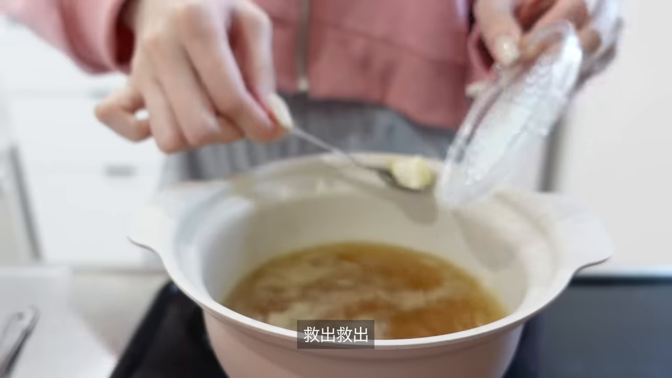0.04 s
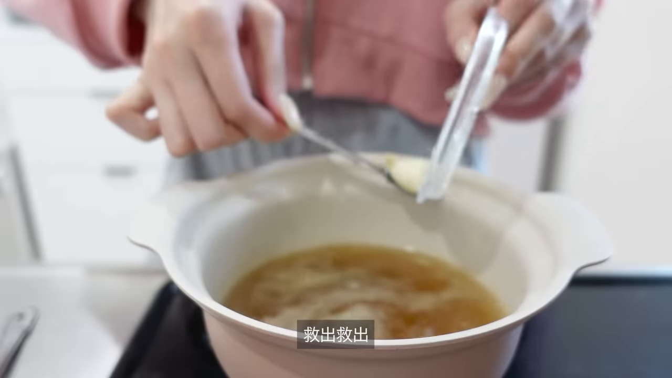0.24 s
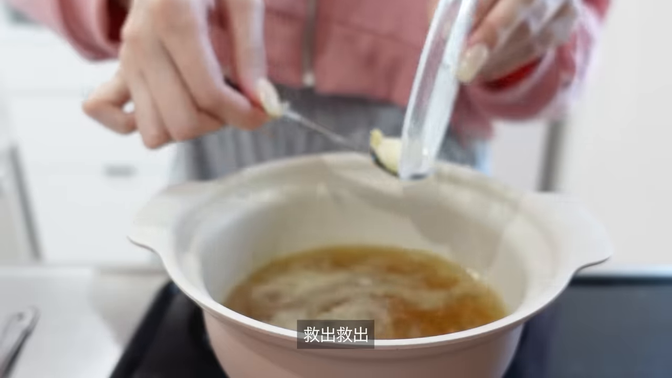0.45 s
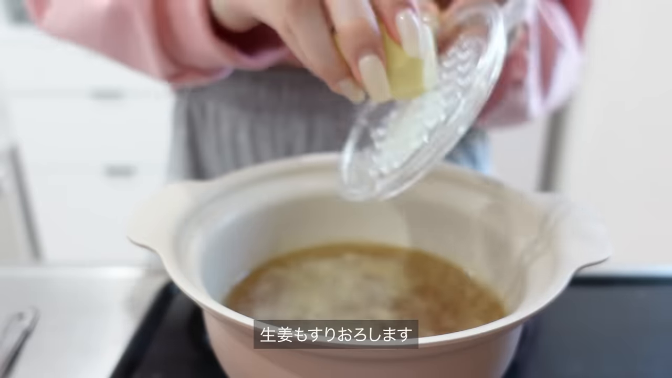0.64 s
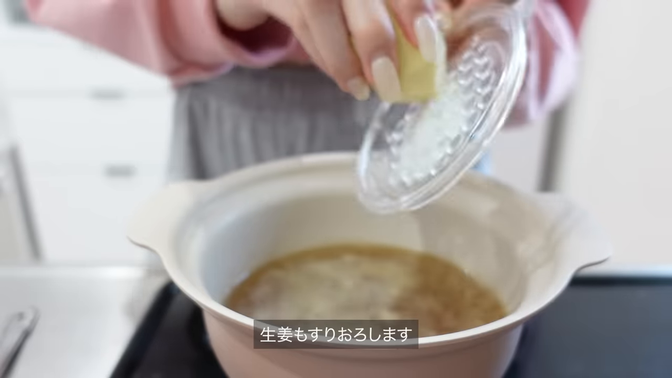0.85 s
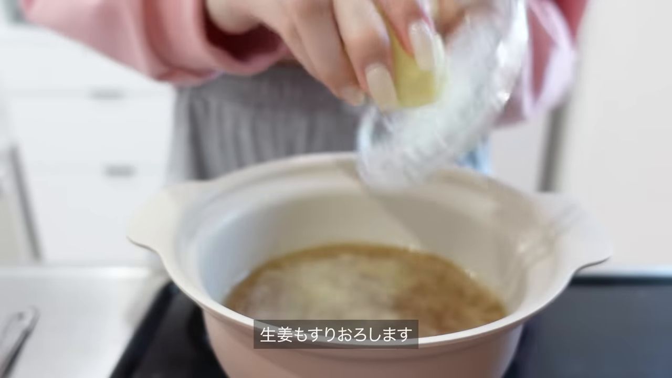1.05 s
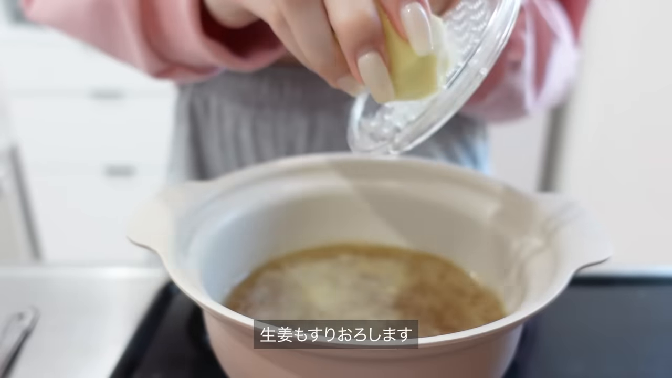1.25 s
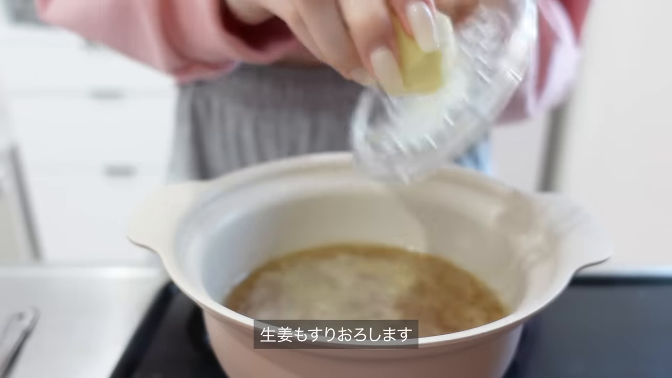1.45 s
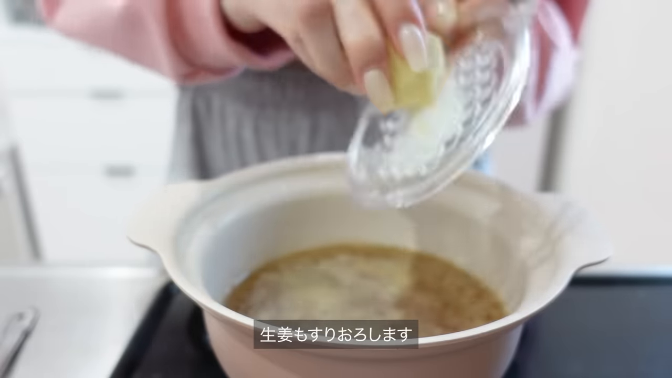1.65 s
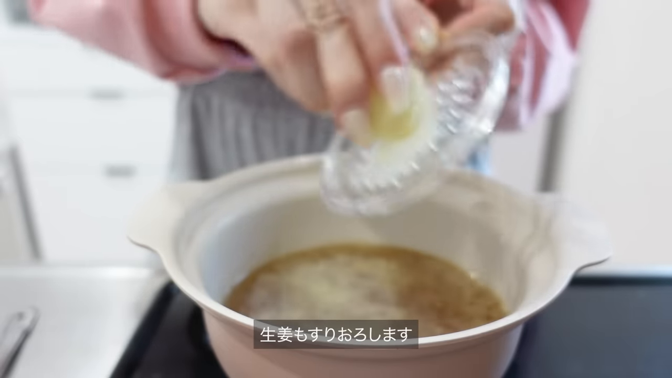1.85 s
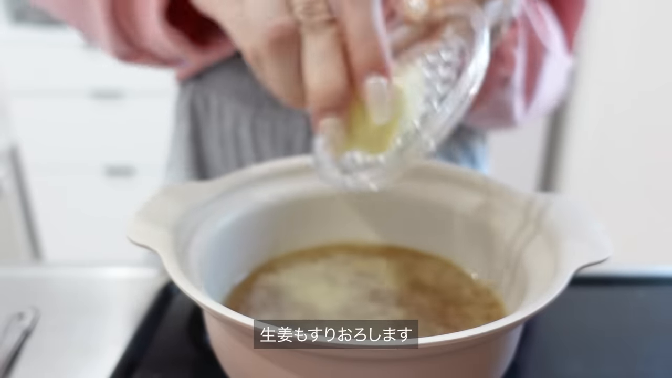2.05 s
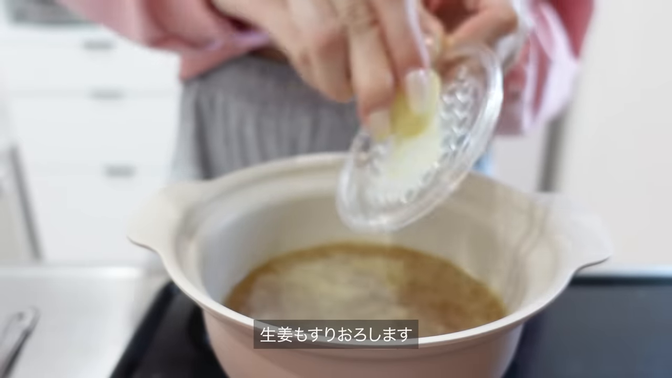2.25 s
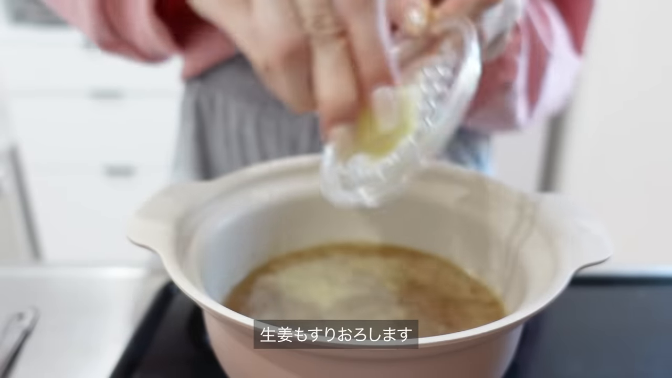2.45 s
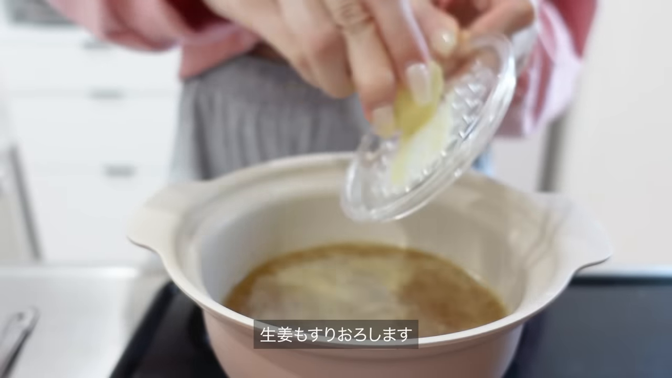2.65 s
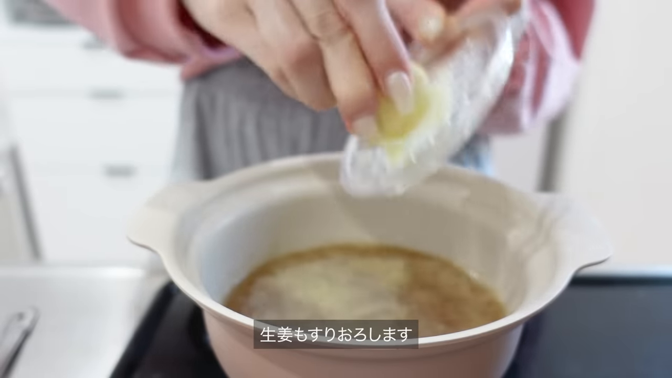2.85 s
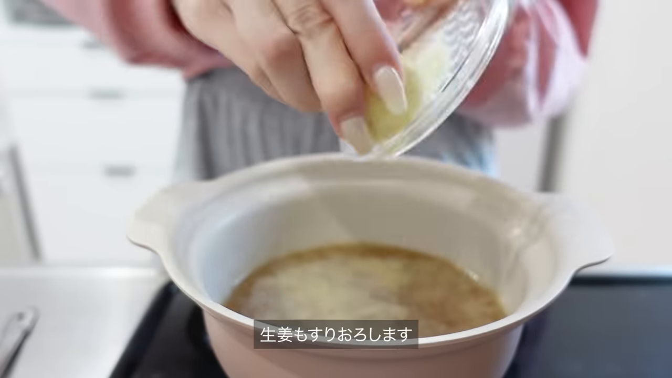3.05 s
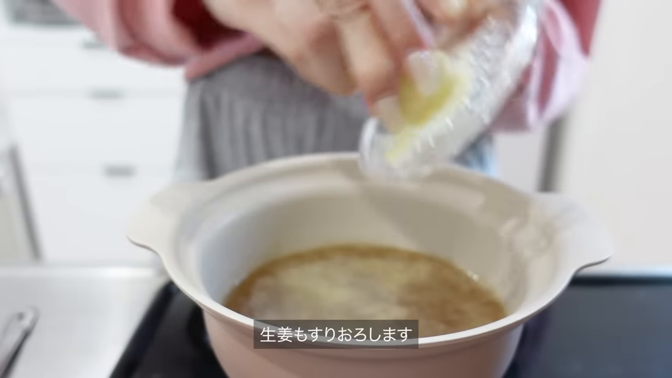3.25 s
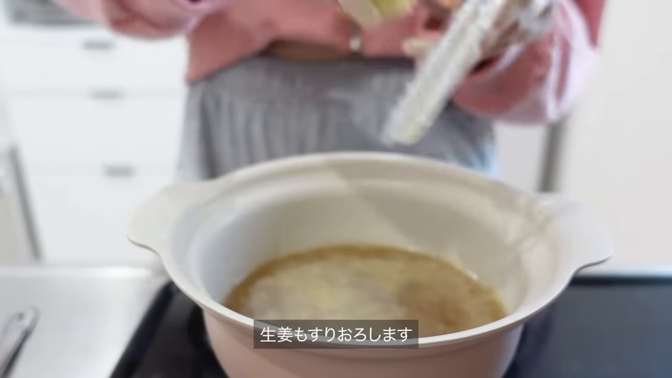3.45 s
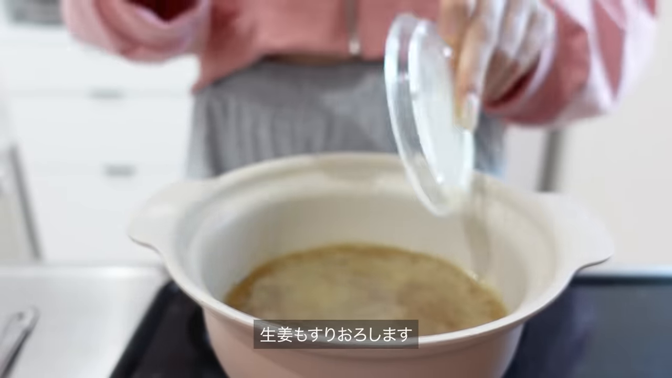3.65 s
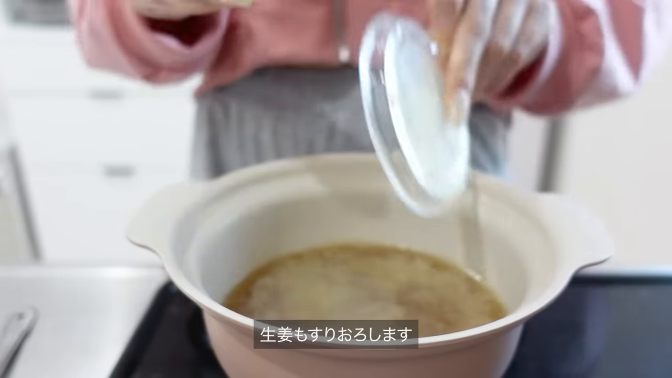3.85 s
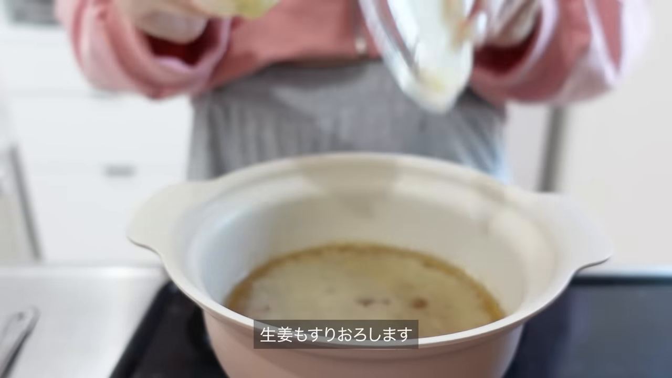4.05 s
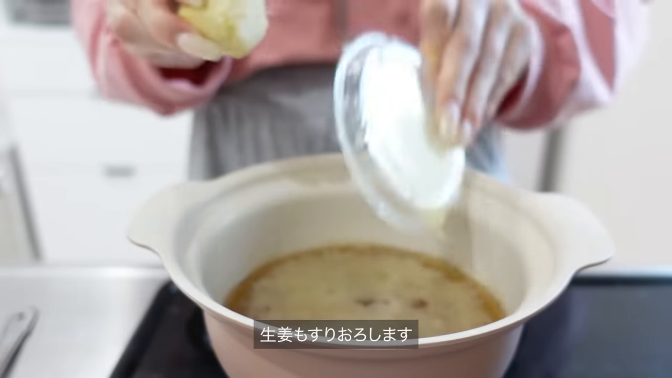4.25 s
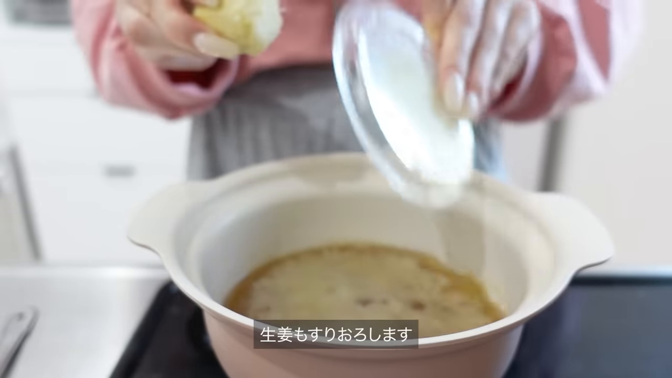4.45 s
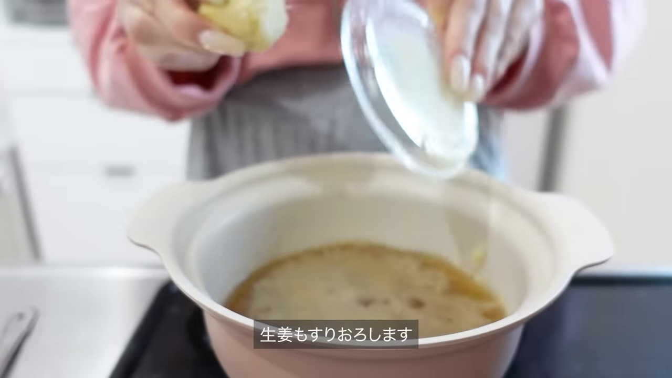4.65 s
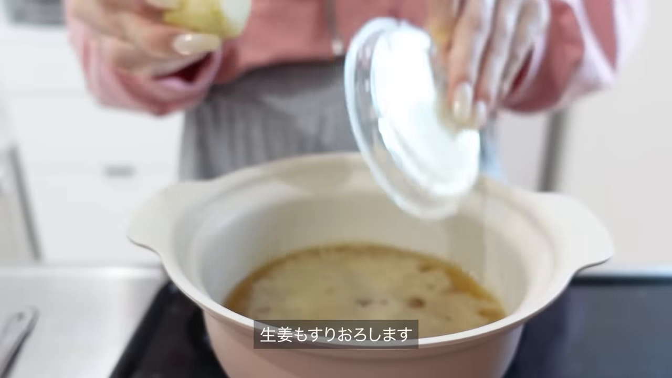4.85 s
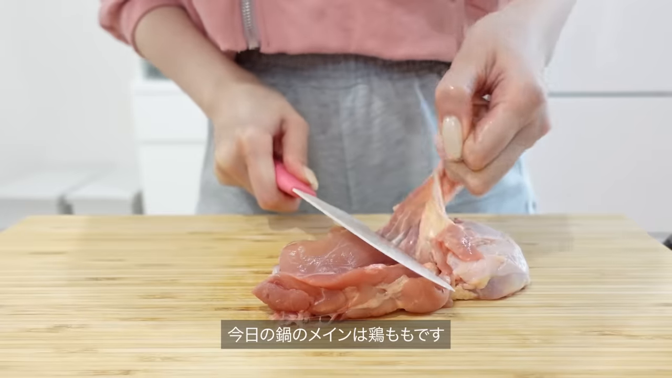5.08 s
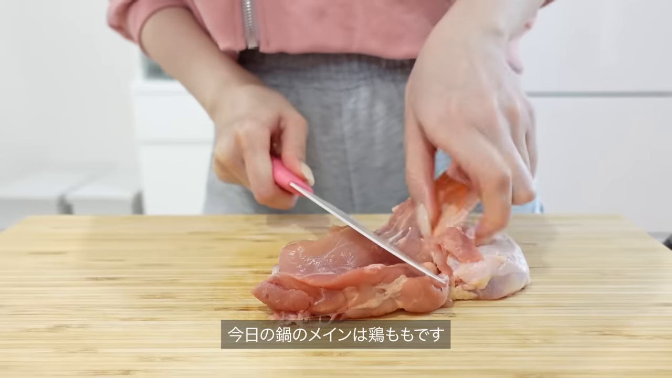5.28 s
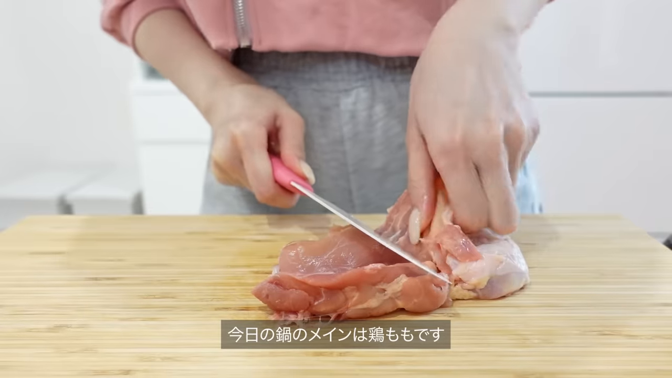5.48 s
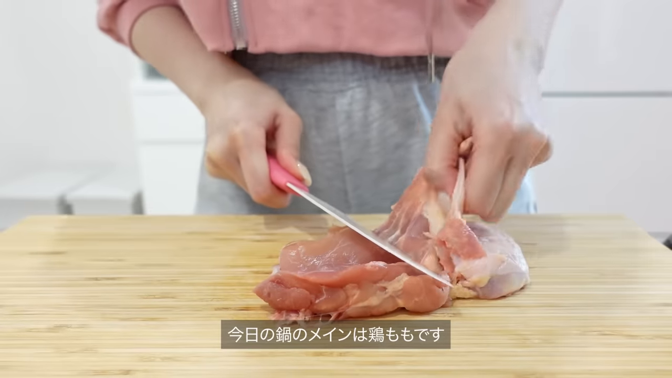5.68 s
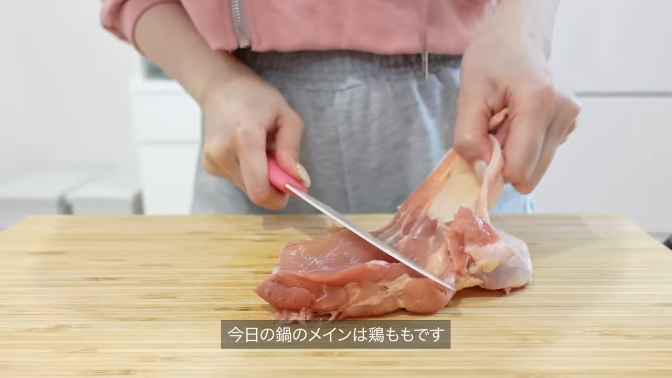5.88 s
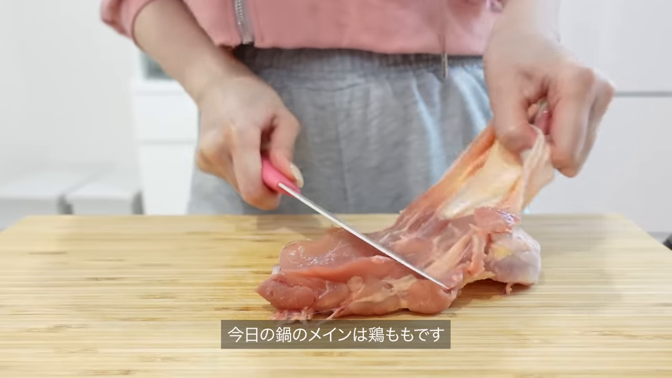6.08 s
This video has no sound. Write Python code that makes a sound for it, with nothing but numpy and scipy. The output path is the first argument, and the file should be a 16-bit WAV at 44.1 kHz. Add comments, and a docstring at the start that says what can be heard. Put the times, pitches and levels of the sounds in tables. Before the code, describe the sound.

A close stereo microphone in a small, lightly reverberant kitchen, with faint steady air. From 0 to 0.3 seconds a spoon scrapes glass with a thin metallic ring, ending in a tick. After a small tap at 0.7, ginger is grated on glass teeth: fibrous, bright rasps, about twelve strokes a second, the glass ringing most at first. At 1.94 everything abruptly becomes faster and higher, about twenty-four strokes a second, with brief snags, easing until 3.48. A soft wet swish follows, then five rapid glass-on-pot knocks from 3.65 to 3.9. At natural speed again from 4.07, a strong knock lands at 4.28, followed by four more until 4.78, cracking, glassy and booming, over faint hiss. From 4.94 it is quiet: a knife works through raw chicken with ticks around 5.05 to 5.3, soft wet rubs, sparse tiny snaps and a weak low hum until 6.2.

```python
"""Ginger is grated on a glass grater over a ceramic pot of broth: fibres snap on the teeth, stroke by stroke.
A spoon scrapes the glass first. Later the grater knocks the pot's rim in two bursts of decaying modes,
crack and boom that a limiter flattens; then a knife works softly through raw chicken (rubs and snaps).
In the fast middle stretch the strokes, knocks and air are quicker and higher."""
import sys
import numpy as np
from scipy import signal
from scipy.fft import rfft, irfft, next_fast_len
from scipy.io import wavfile
from scipy.ndimage import uniform_filter1d, minimum_filter1d

SR = 44100
rng = np.random.default_rng(int(sys.argv[2]) if len(sys.argv) > 2 else 0)


def int16_out(signal):
    """Quantize to a 16-bit WAV file."""
    q = np.round(np.clip(np.atleast_2d(signal).T, -1, 1) * 32767)
    wavfile.write(sys.argv[1], SR, q.astype(np.int16))


N = 269886
T = np.arange(N) / SR


def amp(db):
    """Decibels to gain."""
    return 10 ** (np.asarray(db) / 20)


def unit(x):
    """Scales to rms 1."""
    return x / np.sqrt(np.mean(x ** 2) + 1e-20)


def read(points, hz):
    """A table joined by straight lines on a log-frequency axis."""
    f, value = np.transpose(points)
    return np.interp(np.log(hz + 1), np.log(f + 1), value)


def level(points):
    """Gain over time from rows of (time [s], level [dB]); silent outside them."""
    return amp(np.interp(T, *np.transpose(points), left=-200, right=-200))


def swells(rows):
    """Gain over time from bell-shaped swells: rows of (middle [s], length [s], level [dB])."""
    power = np.zeros(N)
    for middle_s, length_s, db in rows:
        offset = 2 * (T - middle_s) / length_s
        power += amp(db) ** 2 * np.exp(-2 * np.minimum(offset ** 2, 100))
    return np.sqrt(power)


def between(start_s, stop_s):
    """True from start to stop."""
    return (T >= start_s) & (T < stop_s)


def colour(x, points, speed=1):
    """Filters by a spectrum, moved up by the speed."""
    size = next_fast_len(x.shape[-1])
    hz = np.fft.rfftfreq(size, 1 / SR)
    return irfft(rfft(x, size) * amp(read(points, hz / speed)), size)[..., :x.shape[-1]]


def low_cut(x, hz):
    """Takes away the deepest bass."""
    return signal.sosfilt(signal.butter(N=4, Wn=hz, btype="high", fs=SR, output="sos"), x)


def noise(size):
    """Two unrelated noises: middle and side."""
    return rng.standard_normal((2, size))


def grains(per_s, spread_db):
    """A dense train of tiny snaps of uneven size."""
    sizes = amp(spread_db * np.minimum(rng.exponential(1, N), 4))
    return unit(noise(N) * sizes * (rng.random(N) < per_s / SR))


def resonate(x, hz, width_hz):
    """A one-pole resonance, shifted up to a frequency that may follow a curve."""
    turn = np.exp(2j * np.pi * np.cumsum(hz * np.ones(x.shape[-1])) / SR)
    r = np.exp(-np.pi * width_hz / SR)
    return 2 * (turn * signal.lfilter([1 - r], [1, -r], x / turn + 1e-18)).real


def resonate_twice(x, hz, width_hz):
    """Two equal resonances in series, for steeper skirts."""
    return resonate(resonate(x, hz, width_hz), hz, width_hz)


def fade(t, t60):
    """Falls by 60 dB in t60."""
    return np.exp(-np.log(1000) * t / t60)


def add(mix, s, sound):
    """Mixes a sound in at time s."""
    part = mix[:, round(s * SR):][:, :sound.shape[1]]
    part += sound[:, :part.shape[1]]


# kitchen decay at natural speed: (frequency [Hz], t60 [s])
ROOM_DECAY = [(100, 0.75), (300, 0.4), (1000, 0.28), (4000, 0.29), (9000, 0.27), (16000, 0.43)]


def die_away(x, speed, rise_cycles=4):
    """Lets each band build up (bass slowest) and decay as the kitchen does."""
    hz, t, z = signal.stft(x, SR, nperseg=256)
    hz, t = hz[:, None] / speed, t * speed
    swell = 1 - np.exp(-t / (rise_cycles / (hz + 150) + 0.004))
    decayed = z * swell * fade(t, read(ROOM_DECAY, hz))
    return signal.istft(decayed, SR, nperseg=256)[1][:, :x.shape[1]]


def in_room(x, wet_db, speed=1):
    """A sound with its diffuse tail."""
    tail = die_away(noise(SR // 2), speed)
    tail /= np.linalg.norm(tail[0])
    return x + amp(wet_db) * signal.oaconvolve(x, tail, axes=1)[:, :N]


# reflections off pot, hands and counter, at natural speed: (delay [s], level [dB])
CLOSE_ECHOES = [(.0017, -35), (.0031, -19), (.0049, -28), (.0077, -21.5), (0.011, -16)]


def reflect(x, speed):
    """Adds the close reflections, which comb the spectrum."""
    out = x.copy()
    for delay_s, db in CLOSE_ECHOES:
        add(out, delay_s / speed, amp(db) * x)
    return out


# background air spectrum at natural speed: (frequency [Hz], density [dB per Hz])
AIR_SPECTRUM = [(25, -44), (50, -26), (80, -17.5), (130, -2), (180, -0.5), (260, -4), (350, 0.5), (500, -6),
                (680, -5.5), (1400, -13), (2200, -13), (3300, -16), (7000, -19), (16000, -28)]
AIR_DB = -63


def room_air(speed):
    """Steady coloured noise, moved up by the speed."""
    return amp(AIR_DB) * unit(colour(noise(N), AIR_SPECTRUM, speed))


# narrow scrape resonances: (frequency [Hz], width of each of two passes [Hz], level [dB])
SPOON_MODES = [(2140, 310, -1), (3660, 100, 2.5), (3890, 38, 4.5), (4730, 160, -0.5), (5460, 80, -1),
               (6070, 100, 0), (6950, 160, -.5), (7530, 110, 0.5), (8370, 90, -8), (9060, 140, -7.5),
               (9360, 180, -11), (10330, 110, -13)]
# dull rubbing under the scrape: (frequency [Hz], density [dB per Hz])
DULL_SPECTRUM = [(40, -32), (110, -8), (170, 3), (260, -9), (340, -3), (650, -5), (1300, -14.5),
                 (3000, -15), (16000, -53)]
# harder bites of the spoon: (middle [s], length [s], level [dB])
SPOON_BITES = [(.11, 0.034, -56), (.281, 0.049, -48)]
# light drag, then lift-off
DRAG_DB, LIFT_S, LIFT_DB_PER_S = -61, 0.29, 110


def spoon(dull_db=-3):
    """Metal slips on glass, ringing narrow resonances over a dull rubbing."""
    slips = grains(per_s=2800, spread_db=1.5)[:, :SR // 2]
    ring = sum(amp(db) * resonate_twice(slips, hz, width_hz) for hz, width_hz, db in SPOON_MODES)
    scrape = np.zeros((2, N))
    add(scrape, 0, unit(ring) + amp(dull_db) * unit(colour(slips, DULL_SPECTRUM)))
    drag = amp(DRAG_DB - LIFT_DB_PER_S * np.clip(T - LIFT_S, 0, 1))
    return in_room(scrape * np.hypot(drag, swells(SPOON_BITES)), wet_db=-4.5)


# touches of spoon, ginger and knife:
# (time [s], level [dB], low edge of snap [Hz], ring level [dB], t60 [s])
TOUCHES = [(0.33, -40, 2500, -12, 0.043), (0.7023, -36.5, 1420, -9, 0.1), (4.0444, -38.5, 6100, -8, 0.015),
           (5.0427, -35, 3630, 13, 0.016), (5.084, -45, 3770, 21, 0.033), (5.103, -46, 3500, 5, 0.045),
           (5.1517, -53.5, 4120, 19, 0.036), (5.269, -42.5, 6100, 3, .015), (5.285, -40.5, 5200, -19, .02),
           (5.607, -50.5, 7100, -10.5, 0.0086), (5.9335, -53, 9040, -2, 0.051),
           (6.068, -46.5, 7800, -15, .025), (6.083, -52.5, 4100, 17, 0.087)]


def ticks():
    """Short bright snaps, each with one low ring."""
    out, t = np.zeros((2, N)), np.arange(SR // 8) / SR
    for s, db, edge_hz, ring_db, t60 in TOUCHES:
        snap = colour(noise(len(t)), [(edge_hz * 0.81, -24), (edge_hz, 0), (16000, -10)])
        ring = resonate(snap, edge_hz * 0.954, 500)
        add(out, s, amp(db) * unit(snap + amp(ring_db) * ring) * fade(t, t60))
    return in_room(out, wet_db=-7)


# evenly paced runs of strokes: (middle of first stroke [s], stroke to stroke [s])
STROKE_RUNS = [(.783, .0826), (1.354, .0798), (1.967, .0417), (2.298, .0402), (2.707, .0443),
               (3.065, .0435)]
# pressure on the teeth: (time [s], level [dB])
PRESS_LEVEL = [(.783, -32.5), (.93, -30), (1.27, -29.5), (1.42, -32), (1.91, -31), (1.98, -34.3),
               (2.55, -36), (2.67, -33.5), (2.88, -40), (2.98, -34.5), (3.46, -37)]
GRATING_END_S = 3.48
STROKE_S = 0.05  # mean, at natural speed
PUSH_DB, PUSH_SHORTER = 0.5, 0.085  # added for a push, reversed for a pull; the second is a fraction


def stroke_plan(start_s, stop_s, speed):
    """Pulls and louder, shorter pushes in turn: rows of (middle [s], length [s], level [dB])."""
    ends = [s for s, _ in STROKE_RUNS[1:]] + [GRATING_END_S + STROKE_RUNS[-1][1] / 2]
    runs = [np.arange(s, end - step / 2, step) for (s, step), end in zip(STROKE_RUNS, ends)]
    middles = np.concatenate(runs)
    middles = middles[(middles >= start_s) & (middles < stop_s)]
    push = -(-1.) ** np.arange(len(middles))  # -1 = pull, 1 = push
    db = np.interp(middles, *np.transpose(PRESS_LEVEL)) + PUSH_DB * push
    return list(zip(middles, STROKE_S / speed * (1 - PUSH_SHORTER * push), db))


# ginger tearing on the teeth, at natural speed: (frequency [Hz], density [dB per Hz])
RASP_SPECTRUM = [(50, -31), (120, -31), (240, -11), (480, -19), (600, -9), (760, -11), (900, -17),
                 (1180, -20.5), (1500, 0.5), (2700, 1), (4300, 1.5), (5300, -0.5), (9500, 1), (15500, -8)]
# tough fibres that snag and tear: (middle [s], length [s], level [dB])
FIBRE_SNAGS = [(1.679, .008, -30), (2.624, 0.0064, -34.5), (2.657, 0.0098, -29.5), (2.711, 0.0065, -29),
               (3.01, 0.0077, -32.5)]


def grating(strokes, speed, squareness=3.54, ease_db=1.65, catch_db=0.56,
            hollow_hz=1850, swing_hz=380, hollow_db=4, upper_ratio=2.0, upper_db=-1, press_hollow=0.91,
            plate_hz=2590, plate_db=1, bare_db=9, cover_s=0.23, pot_hz=608, pot_db=3):
    """Fibres snap on the teeth in each stroke; hollows under the ginger slide in pitch as it travels."""
    pressure = np.zeros(N)
    for s, length_s, db in strokes:
        place = np.clip((T - s) / (0.52 * length_s), -3, 3)
        pressure += amp(db - ease_db * place) * np.exp(-abs(place) ** squareness)  # bites, then eases
    middles = [row[0] for row in strokes]
    snags = [row for row in FIBRE_SNAGS if middles[0] < row[0] < middles[-1]]
    pressure = np.hypot(pressure, swells(snags))

    # rows of teeth catch and let go
    catches = amp(catch_db * unit(uniform_filter1d(rng.standard_normal(N), size=220)))
    snaps = grains(per_s=7000 * speed, spread_db=0.5)
    tearing = colour(snaps * pressure * catches, RASP_SPECTRUM, speed)

    travel = np.sin(np.pi * np.interp(T, middles, np.arange(len(strokes))))
    # each stroke takes a slightly new path
    grip = np.interp(T, middles, 1 + 0.072 * rng.standard_normal(len(strokes)))
    hz = speed * grip * (hollow_hz + swing_hz * travel)
    hollows = amp(hollow_db) * resonate(tearing, hz, 200 * speed)
    hollows += amp(upper_db) * resonate(tearing, upper_ratio * hz, 300 * speed)
    press_db = np.array([row[2] for row in strokes])
    # a firm press seals the hollows better
    hollows *= amp(press_hollow * np.interp(T, middles, press_db - press_db.mean()))

    # the glass rings freely until pulp covers it
    bare = np.exp(-np.maximum(T - STROKE_RUNS[0][0], 0) / cover_s)
    plate = amp(plate_db + bare_db * bare) * resonate(tearing, plate_hz * speed, 110 * speed)
    pot = amp(pot_db) * resonate(tearing, pot_hz * speed, 50 * speed)  # the pot below sings along
    rasp = unit(reflect(tearing + hollows + plate, speed) + pot)
    return in_room(rasp * np.sqrt(np.mean(pressure ** 2)), wet_db=-9.5, speed=speed)


# wet rubbing and hiss: (frequency [Hz], density [dB per Hz])
WET_SPECTRUM = [(300, -13), (3000, -8), (4500, -6), (6000, -2), (7500, -6), (9800, -4.5), (12000, -10),
                (16000, -11.5)]
# rubs of fingers, ginger and meat: (middle [s], length [s], level [dB])
WET_RUBS = [(3.555, 0.15, -52), (4.97, .18, -61.5), (5.295, 0.2, -61), (5.68, .26, -70.5),
            (5.825, 0.093, -58), (6.07, 0.35, -61.5)]


def rubbing(spark_db=-7):
    """Wet surfaces slide with a fine hiss; the raw meat also parts with small sticky snaps."""
    on_meat = T > STRETCHES_PLAYED[-1][0]
    snaps = on_meat * grains(per_s=250, spread_db=3.5)
    return unit(colour(noise(N) + amp(spark_db) * snaps, WET_SPECTRUM)) * swells(WET_RUBS)


# ginger sliding off the glass: (time [s], level [dB])
SLIDE_LEVEL = [(3.48, -73), (3.52, -61), (3.57, -53), (3.64, -67)]


def slide(slide_hz=6000, width_hz=1300):
    """Ginger slides off the glass: a soft swish of narrow noise."""
    return unit(resonate_twice(noise(N), slide_hz, width_hz)) * level(SLIDE_LEVEL)


# steady hiss behind the knocks: (from [s], to [s], level [dB])
HISS_SPANS = [(3.617, 4.076, -58), (4.07, 4.94, -55)]


def hiss():
    """A faint, even, high hiss: coloured noise gated on and off."""
    gain = sum(amp(db) * between(start_s, stop_s) for start_s, stop_s, db in HISS_SPANS)
    return unit(colour(noise(N), WET_SPECTRUM)) * gain


def ringing(hz, t60, db, t, spread_db=0):
    """Decaying modes, each starting at a chance phase in middle and side."""
    start = np.exp(2j * np.pi * rng.random((2, len(hz))))
    start *= amp(spread_db * rng.standard_normal(len(hz)))
    decays = fade(t, t60[:, None]) * np.exp(2j * np.pi * hz[:, None] * t)
    return ((amp(db) * start) @ decays).real


# All knock tables are at natural speed.
# glass grater mode frequencies [Hz]
GLASS_MODE_HZ = [2184, 3277, 3555, 3660, 3882, 4506, 4673, 4812, 5021, 5052, 5302, 5330, 5479, 5905, 6912,
                 7455, 8150, 8342, 9128, 9380, 11280]
# same modes: (t60 [s], struck on edge [dB], on corner [dB], on face [dB])
GLASS_MODES = [(0.15, -28, -11, -15.5), (.24, -14, -26.5, -15.5), (0.48, -24.5, -30.5, -15),
               (0.41, -11.5, -25.5, -16), (0.81, -15, -13, -36.5), (.17, -31, -24.5, -39),
               (0.12, -15, -3.5, -36), (0.15, -12, -17.5, -18.5), (0.24, -8, -16, -24),
               (0.33, -13, -28.5, -24.5), (0.24, -16, -16, -5.5), (0.19, -16.5, -15.5, -15.5),
               (0.45, -46.5, -33, -16.5), (.22, -40.5, -32.5, -51), (0.22, -25, -26.5, -22),
               (0.095, -9, -13.5, -21), (0.13, -27.5, -20, -25.5), (0.2, -37.5, -24.5, -33.5),
               (.17, -24.5, -22.5, -16.5), (0.14, -24, -14.5, -34), (0.15, -30, -20.5, -22)]
# filled pot's modes: (frequency [Hz], t60 [s], level [dB])
POT_MODES = [(256.6, 0.18, -25.5), (473.5, 0.17, -23), (579.5, 0.27, -24), (603.5, 0.17, -18.5),
             (1047, 0.097, -19), (1463, 0.1, -25)]
# crack of the contact: (frequency [Hz], density [dB per Hz])
CRACK_SPECTRUM = [(30, -58), (200, -48.5), (700, -5), (1100, 8), (1900, 3), (2900, -8), (5000, -14),
                  (9000, -1), (11400, -6), (12300, -13.5), (16000, -15)]
# boom of pot and stove: (frequency [Hz], density [dB per Hz])
BOOM_SPECTRUM = [(35, -57.5), (80, -17), (130, -2.5), (260, -6), (350, -6.5), (480, 2.5), (600, -1),
                 (720, -1.5), (1100, -5), (2200, -4), (2900, -11), (5000, -6.5), (10500, -15), (15000, -26)]


def knock(force_db, place, boom_db, speed, partials_hz,
          crack_db=-5.5, crack_t60=0.025, tail_db=-18.0, boom_side_db=-7,
          partials_db=-26, partials_t60=0.064, glass_side_db=1, glass_right=0.3):
    """A crack, the glass's modes and faint partials, and the pot's boom spreading through the room."""
    t = np.arange(SR * 2 // 3) / SR * speed
    t60, *place_db = np.transpose(GLASS_MODES)
    # blend the two nearest places of contact
    weights = np.maximum(1 - abs(np.arange(3) - np.clip(place, 0, 2)), 0)
    glass = ringing(np.array(GLASS_MODE_HZ), t60, weights @ np.array(place_db), t)
    faint_t60 = partials_t60 * (partials_hz / 7000) ** -0.2
    faint_db = partials_db + read(CRACK_SPECTRUM, partials_hz)
    add(glass, 0, ringing(partials_hz, faint_t60, faint_db, t[:SR // 4], spread_db=9))
    glass[1] = amp(glass_side_db) * glass[1] - glass_right * glass[0]  # held a little to the right

    pot = ringing(*np.transpose(POT_MODES), t) * (1 - fade(t, 0.055))  # heavy pot takes a moment to sound
    crack = amp(crack_db) * unit(colour(noise(len(t)), CRACK_SPECTRUM, speed)) * fade(t, crack_t60)
    wash = amp(tail_db) * die_away(unit(colour(noise(len(t)), BOOM_SPECTRUM, speed)), speed)
    body = reflect(crack + amp(boom_db) * wash, speed) + amp(boom_db) * pot
    return amp(force_db) * (glass + body * amp([[0], [boom_side_db]]))


# tones around the cutting board: (frequency [Hz], width of each of two passes [Hz], level [dB])
BOARD_TONES = [(86, 25, -81), (323, 44, -71), (2110, 130, -80), (2880, 160, -81)]


def room_tones():
    """Narrow bands of noise that hang in the room while the meat is cut."""
    source = noise(N)
    tones = sum(amp(db) * unit(resonate_twice(source, hz, width_hz)) for hz, width_hz, db in BOARD_TONES)
    return tones * (T > STRETCHES_PLAYED[-1][0])


# low hum: (time [s], level [dB])
HUM_LEVEL = [(5.1, -88), (5.25, -64), (5.55, -66), (5.85, -63.5), (6.0, -71.5), (6.12, -72)]
HUM_HZ = 145


def hum(waver_db=-11):
    """A low sine that wavers a little, by added narrow noise at its pitch."""
    waver = unit(resonate_twice(noise(N), HUM_HZ, 30))
    return unit(np.sin(2 * np.pi * HUM_HZ * T) + amp(waver_db) * waver) * level(HUM_LEVEL)


# microphone pair, side against middle: (frequency [Hz], level [dB])
SIDE_LEVEL = [(60, -27.5), (250, -15.5), (600, -9.5), (1500, -6.5), (3500, -13), (12000, -10)]
# microphone pair, left over right: (frequency [Hz], level [dB])
LEFT_OVER_RIGHT = [(200, 0), (2400, -.6), (4500, -1), (15000, -0.54)]


def microphone_pair(mix):
    """Turns middle and side into left and right."""
    middle, side = mix[0], colour(mix[1], SIDE_LEVEL)
    channels = []
    for sign in (1, -1):
        lean = [(hz, sign * db / 2) for hz, db in LEFT_OVER_RIGHT]
        channels.append(colour(middle + sign * side, lean))
    return np.array(channels)


FAST = 1.771  # speed factor of the middle stretch
# abruptly starting and stopping stretches: (from [s], to [s], speed factor [1])
STRETCHES_PLAYED = [(0, 1.942, 1), (1.942, 4.073, FAST), (4.073, 4.942, 1), (4.942, 6.2, 1)]
# grater on pot: (time [s], force [dB], contact [0 = edge, 1 = corner, 2 = face], pot boom [dB])
POT_KNOCKS = [(3.645, -21.5, 0.36, 4), (3.7083, -6.5, 0.015, 6.5), (3.774, -9, 0, 8.5),
              (3.836, -8.5, 0.17, 6.5), (3.895, -6, 0.4, 2.5), (4.2812, 2, 1.22, -3),
              (4.4201, -7.5, 1.67, 2), (4.5293, -4, 1.61, 5.5), (4.657, -6.5, 1.8, 4.5),
              (4.776, -7.5, 1.93, 3.5)]
# treble of the fast stretch: (frequency [Hz], gain [dB])
FAST_TREBLE_GAIN = [(8000, 0), (11000, 0.5), (16000, -2)]
LOW_CUT_HZ = 54  # at natural speed


def scene():
    """Each stretch holds its own air, strokes and knocks; the small sounds lie on top."""
    mix = spoon() + ticks() + rubbing() + slide() + hiss() + room_tones() + hum()
    partials_hz = rng.uniform(4000, 15000, size=44)  # the same glass rings in every knock
    for start_s, stop_s, speed in STRETCHES_PLAYED:
        part = room_air(speed)
        strokes = stroke_plan(start_s, stop_s, speed)
        if strokes:
            part += grating(strokes, speed)
        for s, *blow in POT_KNOCKS:
            if start_s <= s < stop_s:
                add(part, s, knock(*blow, speed, partials_hz))
        if speed > 1:
            part = colour(part, FAST_TREBLE_GAIN)
        gate = uniform_filter1d(1. * between(start_s, stop_s), size=128)
        mix += low_cut(part, LOW_CUT_HZ * speed) * gate
    return microphone_pair(mix)


def record(dry, limit_db=-15.5, recover_db_per_s=260, edge_hz=15950):
    """A fast limiter flattens the loud start of the knocks; then the band limit."""
    power_db = 10 * np.log10(abs(uniform_filter1d((dry ** 2).mean(0), size=160)) + 1e-12)
    fall_db = T * recover_db_per_s
    held_db = np.maximum.accumulate(power_db + fall_db) - fall_db
    over_db = np.maximum(held_db - limit_db, 0)
    over_db = -minimum_filter1d(-over_db, size=100)  # looks a millisecond ahead
    limited = dry / amp(uniform_filter1d(over_db, size=40))
    band_limit = signal.firwin(401, edge_hz, window=("kaiser", 9), fs=SR)
    return signal.oaconvolve(limited, band_limit[None], "same")


dry = scene()
out = record(dry)
int16_out(out)
```